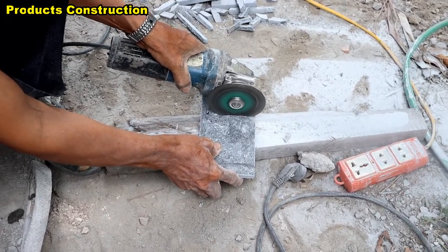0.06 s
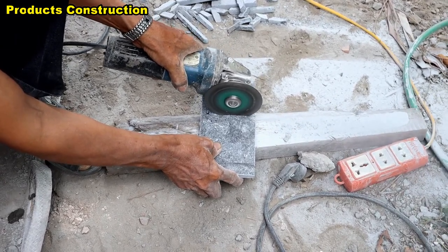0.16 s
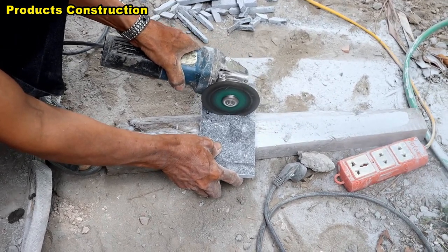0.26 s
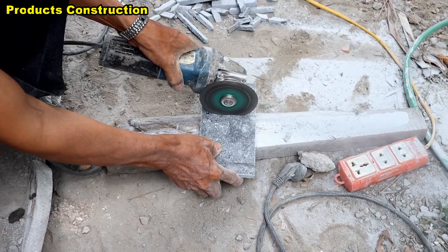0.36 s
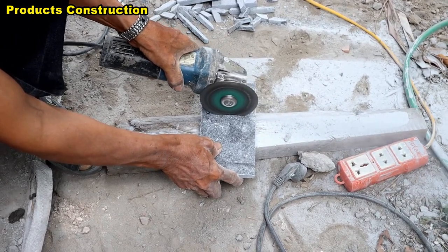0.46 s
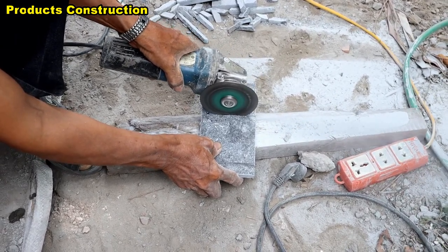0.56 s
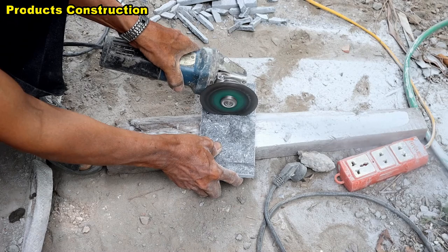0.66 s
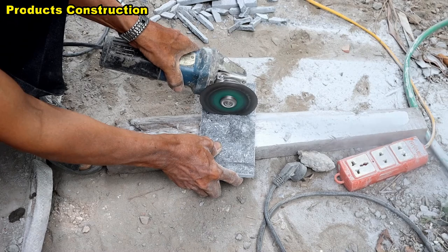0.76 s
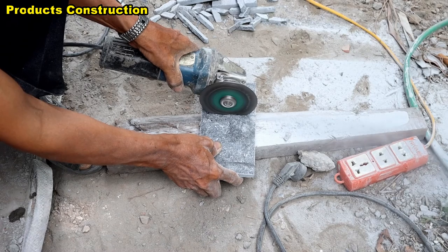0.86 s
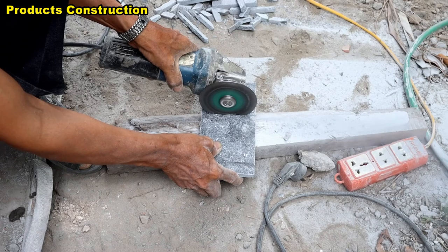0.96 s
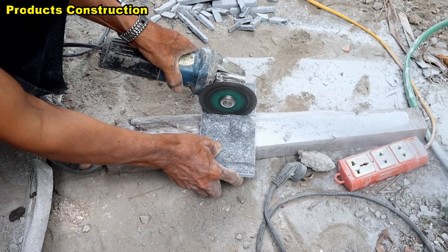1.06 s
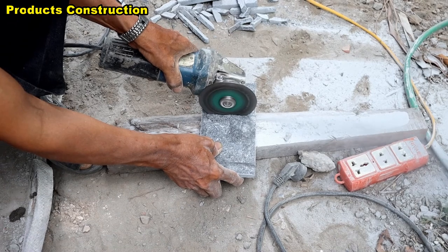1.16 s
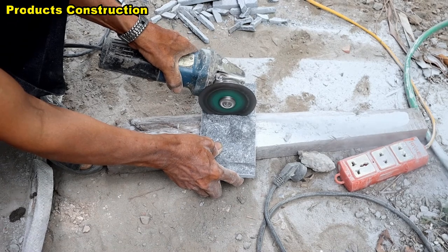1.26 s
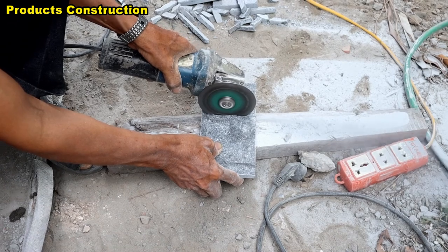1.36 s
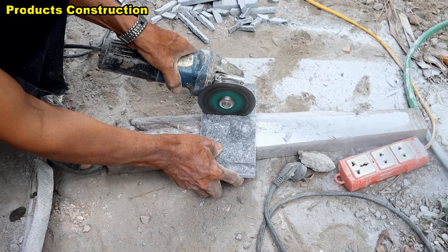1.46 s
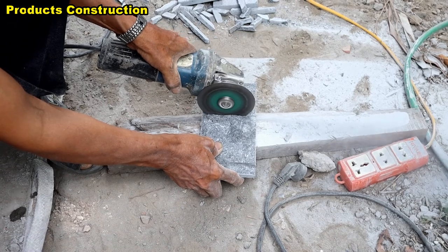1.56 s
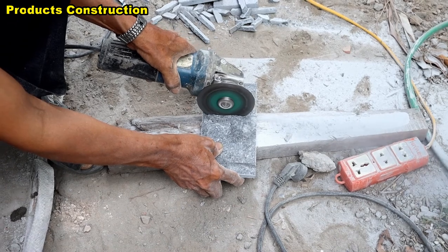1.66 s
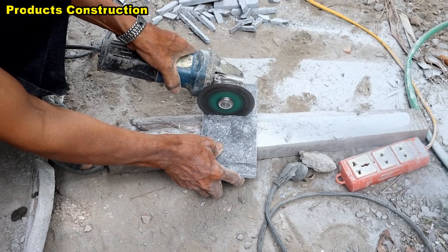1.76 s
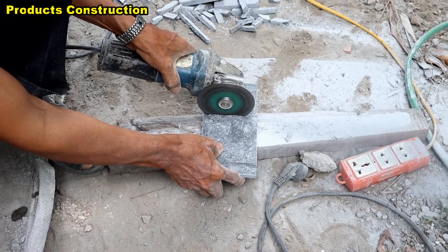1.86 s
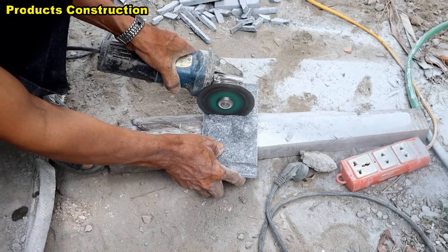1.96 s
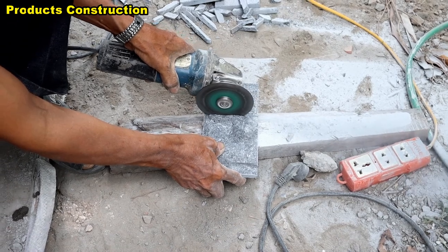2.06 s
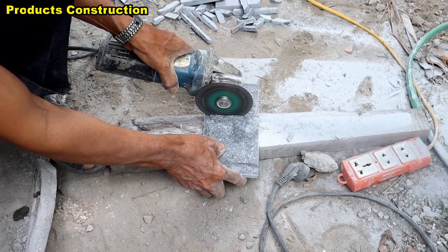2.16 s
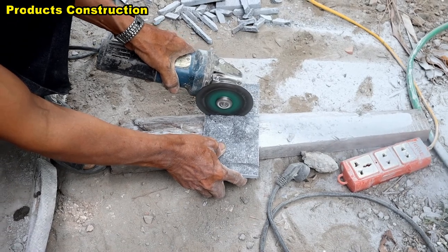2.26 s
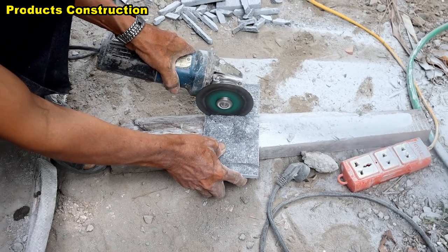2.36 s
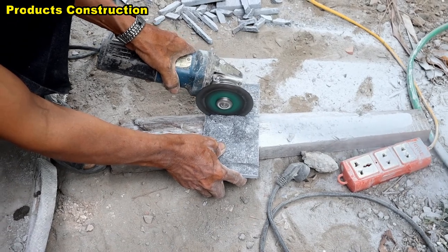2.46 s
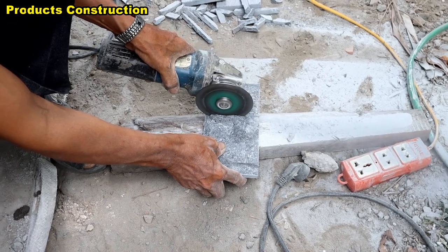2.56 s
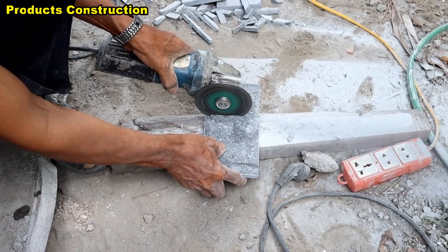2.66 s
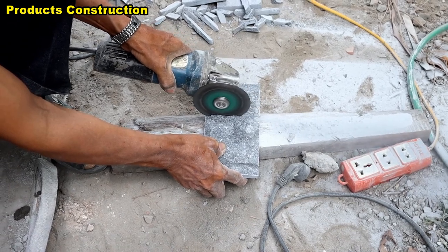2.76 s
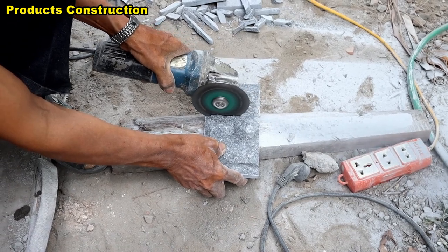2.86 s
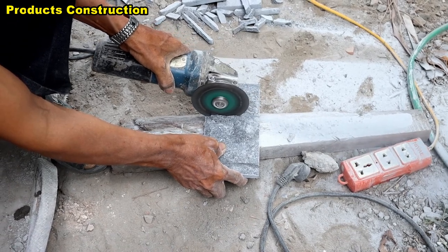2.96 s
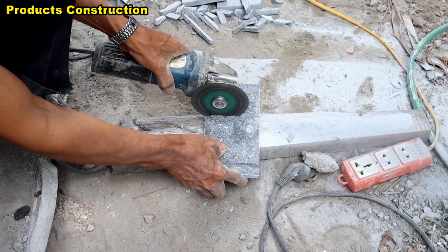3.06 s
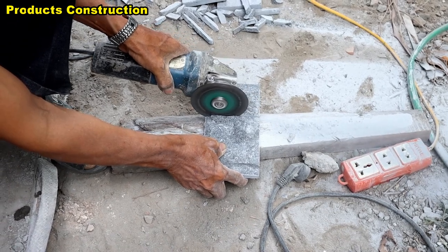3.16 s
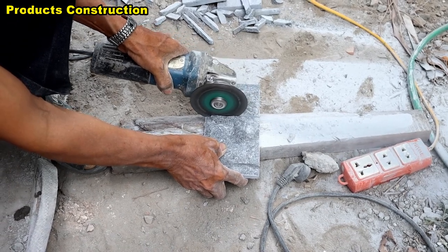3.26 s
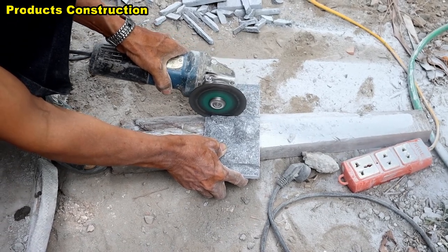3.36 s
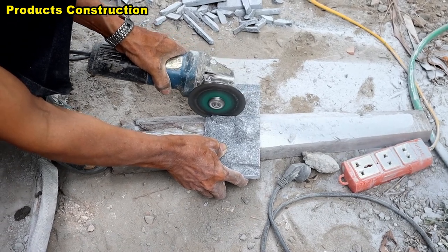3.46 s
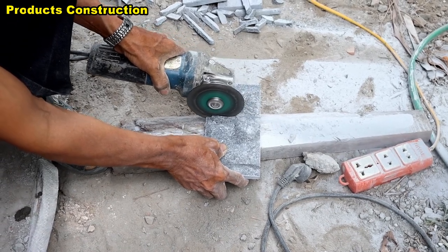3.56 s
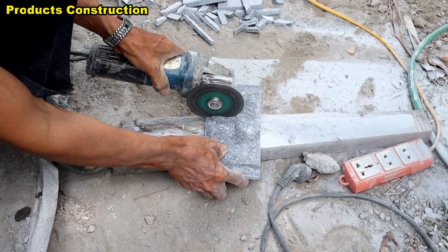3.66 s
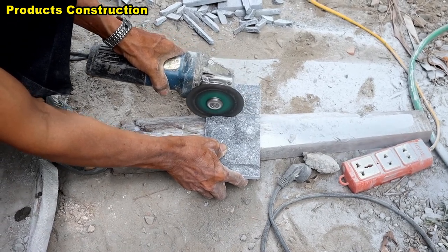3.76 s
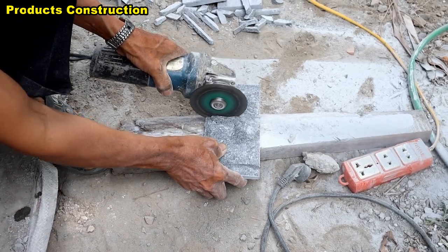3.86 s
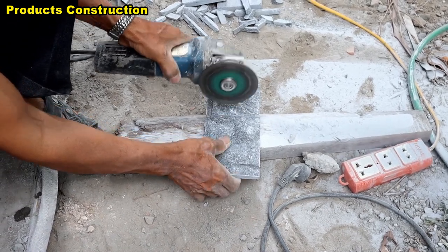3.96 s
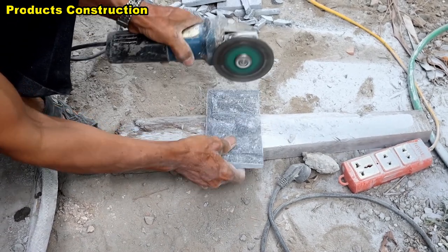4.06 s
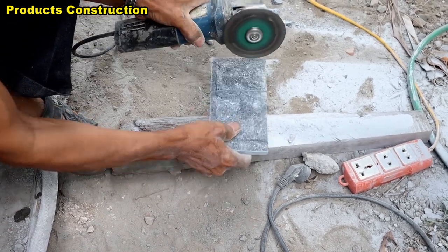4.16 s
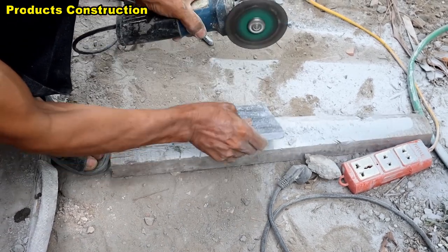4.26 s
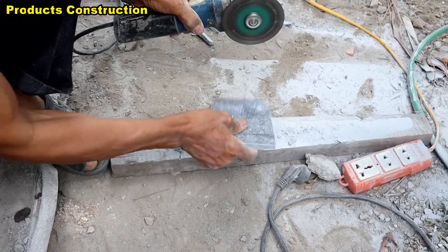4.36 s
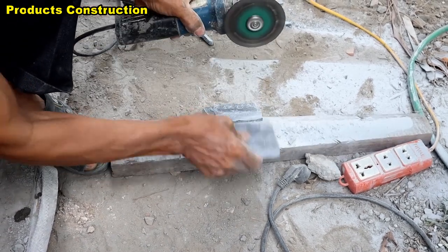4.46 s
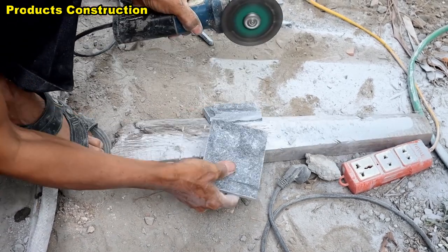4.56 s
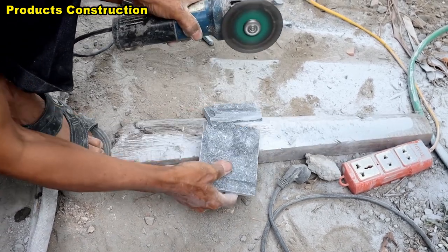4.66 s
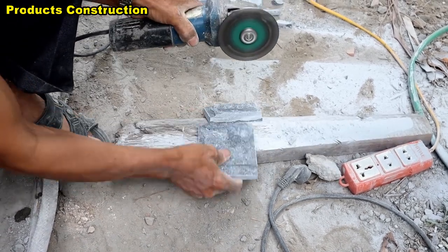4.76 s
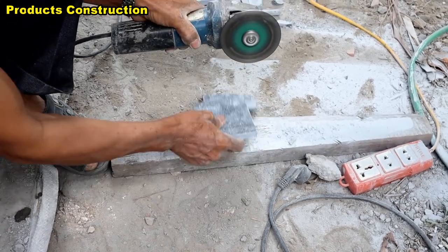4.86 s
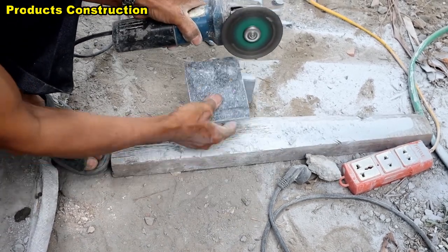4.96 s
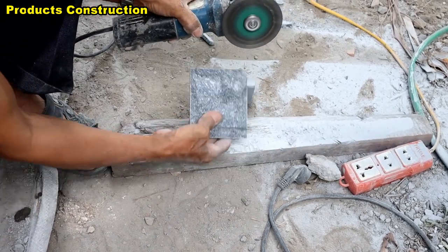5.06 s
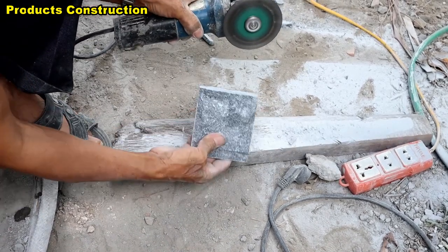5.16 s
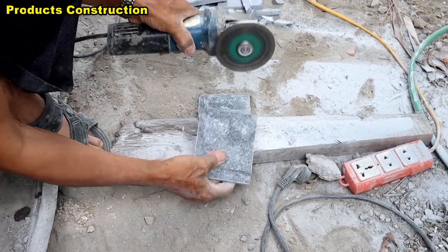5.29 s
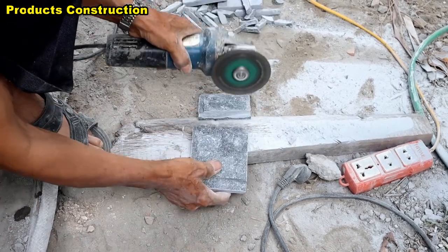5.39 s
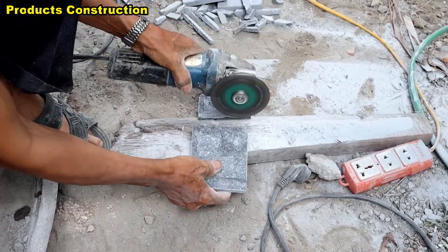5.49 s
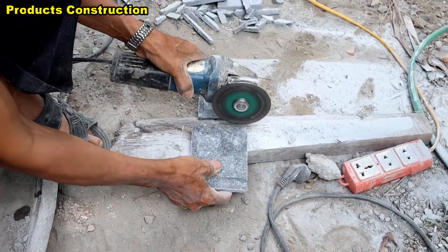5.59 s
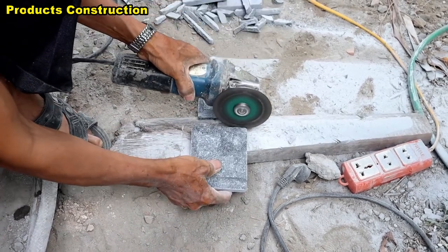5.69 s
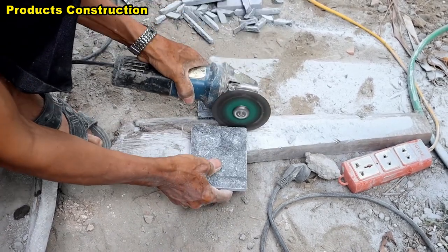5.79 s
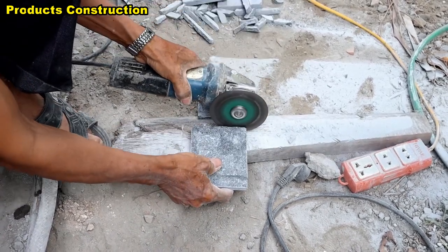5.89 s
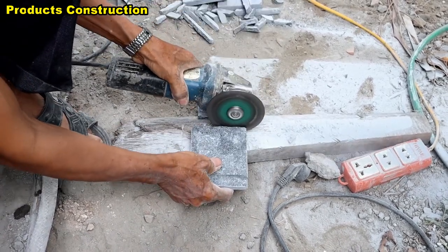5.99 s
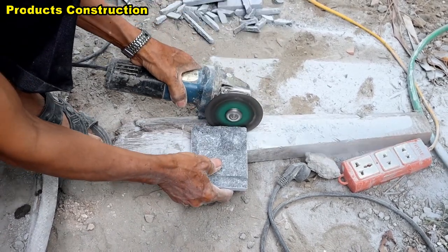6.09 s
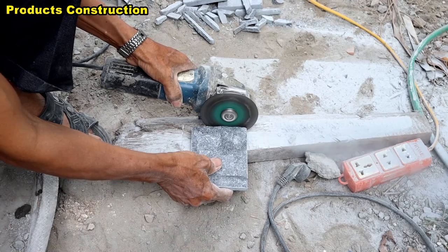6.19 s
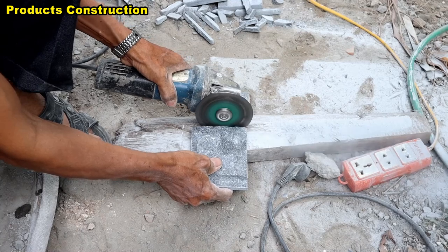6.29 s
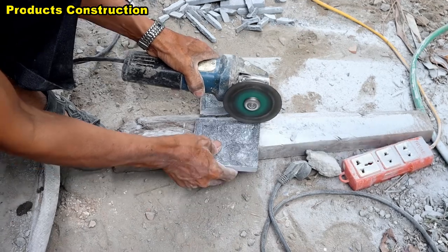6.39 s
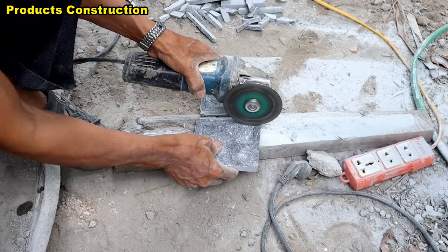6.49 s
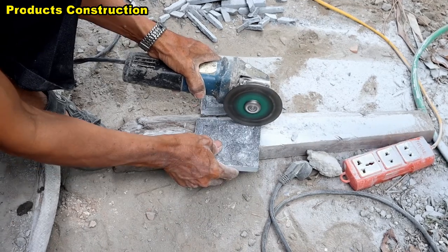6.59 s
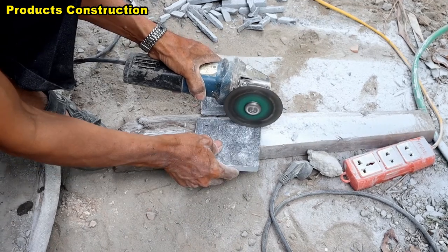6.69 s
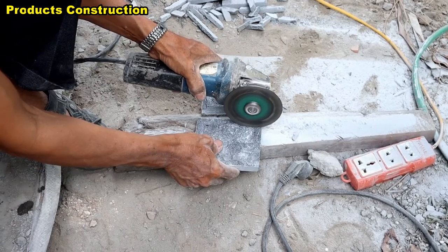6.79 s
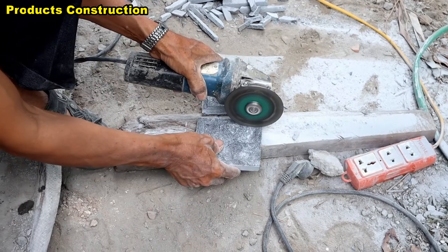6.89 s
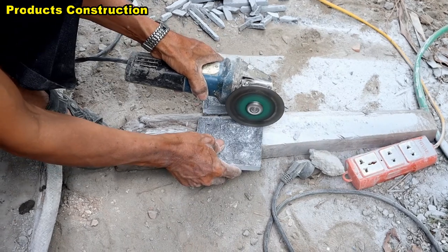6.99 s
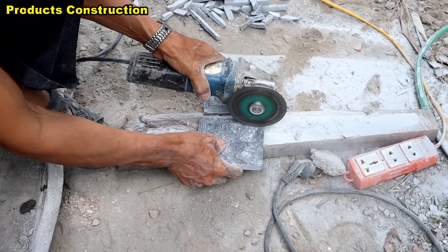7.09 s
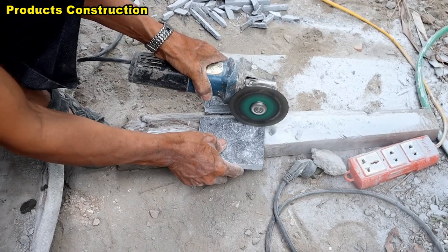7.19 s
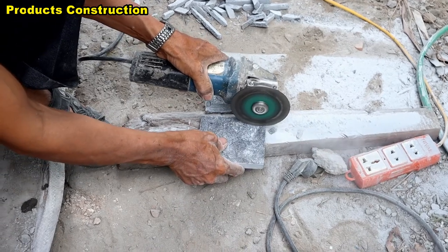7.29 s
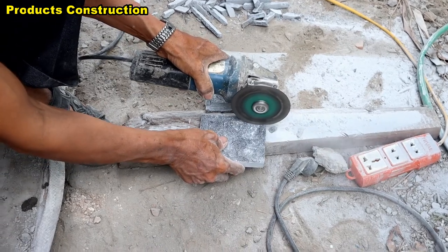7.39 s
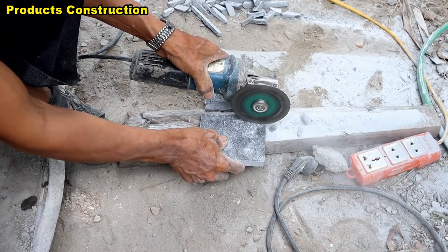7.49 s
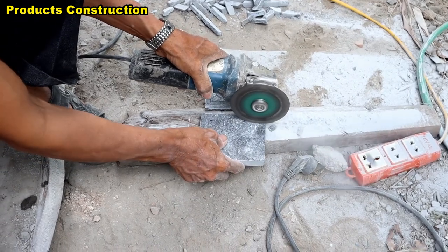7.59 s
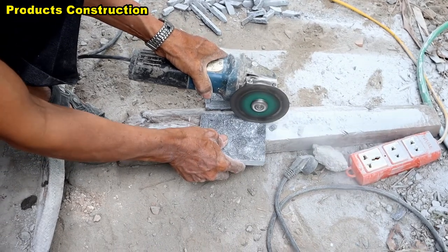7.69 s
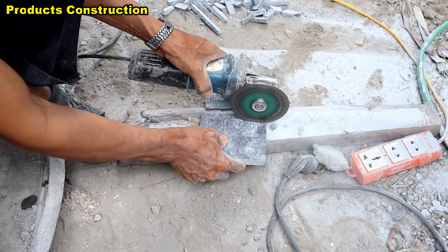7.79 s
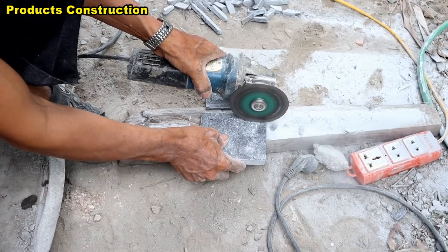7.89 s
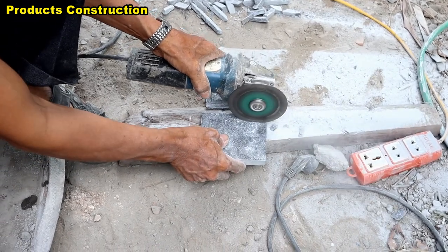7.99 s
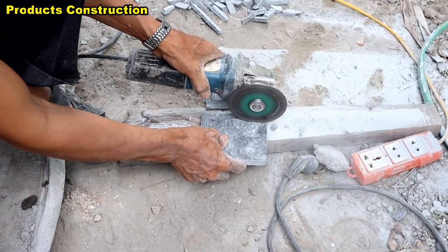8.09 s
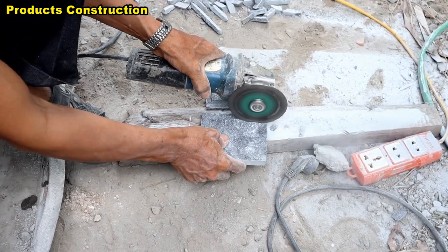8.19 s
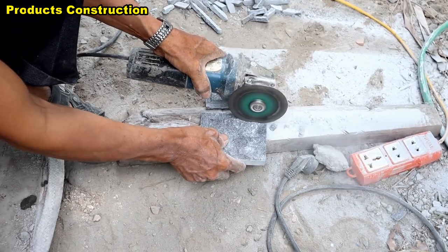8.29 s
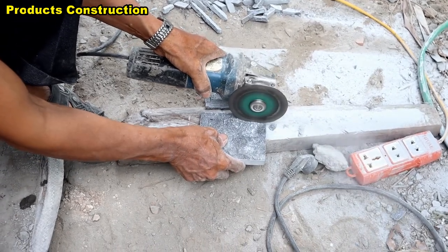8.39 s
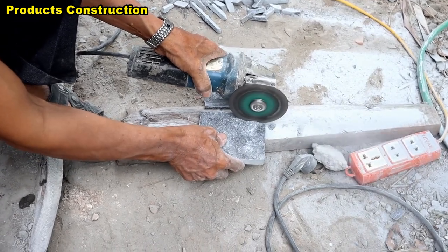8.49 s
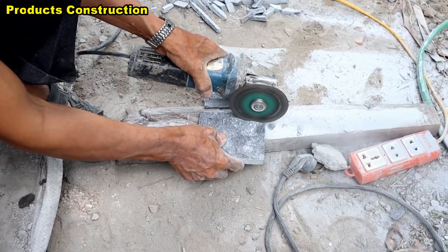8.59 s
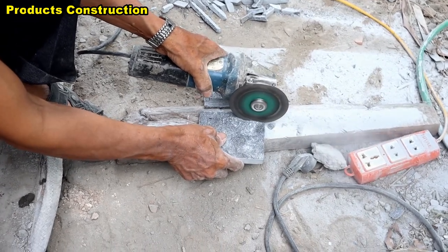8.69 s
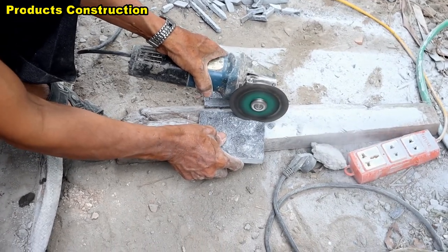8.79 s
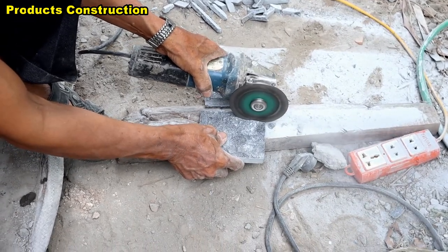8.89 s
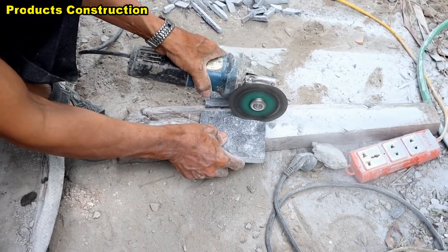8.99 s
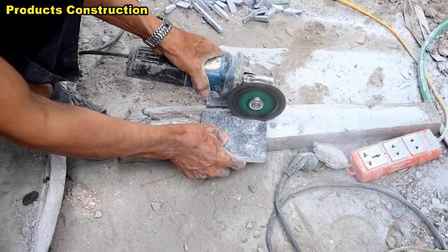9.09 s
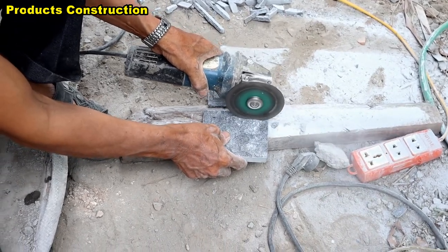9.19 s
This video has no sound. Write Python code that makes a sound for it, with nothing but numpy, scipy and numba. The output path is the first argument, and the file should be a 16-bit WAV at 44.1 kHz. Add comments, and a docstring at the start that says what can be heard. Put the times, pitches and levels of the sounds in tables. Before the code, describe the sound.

An angle grinder screeches through a stone tile up close, breaks free and whirs while the tile is knocked about, grazes, then cuts again louder.

```python
"""An angle grinder, close to the microphone, is already sawing a strip off a stone tile; the strip's tone sinks.
The disc breaks through and runs free while the tile is knocked and dragged on a plank. It strikes the stone in a
short graze, then sinks into a second, louder cut. Grit noise rings resonators for disc, tile, strip and housing;
gliding sines squeal and slip. Throughout, resonators at multiples of the disc speed whine, filtered noise makes
the rush of the cooling fan, and low noise puffs buffet the microphone."""
import sys
import numpy as np
from scipy import signal
from scipy.fft import rfft, irfft, next_fast_len
from scipy.io import wavfile
from numba import njit

SR = 44100
rng = np.random.default_rng(int(sys.argv[2]) if len(sys.argv) > 2 else 0)


def dump_mix(stems):
    """Bounce the given channels to the path in sys.argv[1] as a 16-bit WAV at rate SR."""
    frames = np.atleast_2d(stems).T  # one column per channel
    limited = np.clip(frames, -1, 1)  # hard clip at full scale
    pcm = np.round(limited * 32767).astype(np.int16)
    wavfile.write(sys.argv[1], SR, pcm)


N = 407925
TIME = np.arange(N) / SR   # seconds

# disc on stone, long cut, graze, long cut: start_s, end_s, grinding_db, ease_in_s, release_s,
# freedom_at_start, freedom_at_end (0 pinched in the slot, 1 riding on its edge)
CUTS = [(-.5, 4.07, -29, .3, .05, 0, 0.27), (5.872, 6.119, -25, 0.00054, .02, 0.12, 0.48),
        (6.55, 11.1, -21.5, 0.29, .06, 0.78, 0.4)]
# modes of the free tile: pitch_hz, width_hz, level_db
TILE = [(1117, 112, 1), (460, 75, -28), (1610, 460, -8), (2700, 630, -25)]
# narrow modes that sing out of the grinding, mostly the disc's: pitch_hz, width_hz, shift_at_full_depth_hz,
# first_cut_db, graze_db, second_cut_db, left_right_db
SINGING = [(1570, 86, 14, -25, -19, -25, 5), (2964, 51, 6, -9.5, -8, -15, -8.5),
           (3377, 48, 104, -28, -12, -9, -3), (3470, 56, 67, -6, -13, -18, 6.5),
           (3700, 55, 7, -4.5, -12, -10.5, 2), (3985, 59, -3, -26, -21, -13.5, -1),
           (4310, 42, 90, -9.5, -18, -13.5, 18), (4915, 67, -24, -41, -13, -8.5, 2.5),
           (5360, 74, 166, -25.5, -18, -20, -8), (6190, 71, -80, -14.5, -19, -14.5, -8.5),
           (6216, 68, 195, -13.5, -21, -16.5, 0), (7360, 97, -100, -19.5, -19.5, -21.5, -1),
           (8760, 55, -100, -26, -26, -24, -8), (10600, 61, 0, -27, -35, -24, -7)]
# how deep the disc sits in the slot: time_s, depth (0-1)
DEPTH = [(0, 0.76), (1.3, 0.94), (2.5, 0.53), (3.5, 0.2), (4.07, 0.05), (6.9, 0), (7.5, 0.25), (8.4, 0.74),
         (9.25, 0.62)]


def from_db(db):
    """Decibels to amplitude."""
    return 10 ** (np.asarray(db) / 20)


def rms_one(x):
    """Scale to an rms of 1."""
    return x / np.sqrt(np.mean(x ** 2) + 1e-20)


def in_time(rows):
    """Draw each column as a curve over the whole scene; the first column is time in seconds."""
    s, *columns = np.transpose(rows)
    return [np.interp(TIME, s, column) for column in columns]


def panned(pan_db):
    """Left and right gains of unchanged total power."""
    return rms_one(from_db([[pan_db / 2], [-pan_db / 2]]))


def bump(s, length):
    """A smooth swell of height 1, down to 14 % at one length from its centre."""
    out = np.zeros(N)
    near = np.abs(TIME - s) < 3 * length
    out[near] = np.exp(-2 * ((TIME[near] - s) / length) ** 2)
    return out


def drift(rate_hz):
    """Slow chance of spread 1: noise through two equal low-pass poles, drawn at every 40th sample."""
    step = 40
    r = np.exp(-2 * np.pi * rate_hz * step / SR)
    noise = rng.standard_normal(N // step + 2002)
    slow = signal.lfilter([1], [1, -2 * r, r * r], noise)[2000:]   # skip the filter's start-up
    return np.interp(np.arange(N) / step, np.arange(len(slow)), rms_one(slow))


def coloured(spectrum):
    """Diffuse stereo noise of the given colour; rms 1."""
    size = next_fast_len(N)
    hz, db = np.transpose(spectrum)
    bins_hz = np.maximum(np.arange(size // 2 + 1) * SR / size, 1)
    gain = from_db(np.interp(np.log(bins_hz), np.log(hz), db))
    noise = rfft(rng.standard_normal((2, size)))
    return rms_one(irfft(noise * gain, size)[:, :N])


@njit
def resonate(force, hz, width):
    """Two one-pole resonators in series, whose centre and width may move; steady power for noise."""
    out = np.zeros(force.shape)
    for side in range(2):
        first, second, pole, gain = 0j, 0j, 0j, 0.
        for i in range(force.shape[1]):
            if i % 32 == 0:
                r = np.exp(-np.pi * width[i] / SR)
                pole = r * np.exp(2j * np.pi * hz[i] / SR)
                gain = (1 - r) ** 1.5
            first = pole * first + gain * force[side, i]
            second = pole * second + first
            out[side, i] = second.real
    return out


def mode(grains, hz, width):
    """One mode rung by grains, which each mode meets from another starting point; rms 1."""
    force = np.roll(grains, rng.integers(N), axis=1)
    return rms_one(resonate(force, hz * np.ones(N), width * np.ones(N)))


def each_turn(x, speed, share, count=3):
    """The same rim comes round again: a share of the sound repeats every turn, in strands that follow the speed."""
    out = x.copy()
    for k in range(1, count + 1):
        delay = (k * SR / speed).astype(int)
        out += share ** k * np.take(x, np.arange(N) - delay, axis=1)   # the start borrows from the end
    return out / np.sqrt(np.sum(share ** (2 * np.arange(count + 1))))


def site(x):
    """A few early echoes from floor and walls, different at each ear; the power is kept."""
    # left_delay_s, right_delay_s, level_db
    echoes = [(.0047, 0.0031, -13), (.0113, 0.0058, -23), (.0179, 0.016, -22)]
    out = x.copy()
    for *delays, db in echoes:
        for side, delay in enumerate(delays):
            lag = round(delay * SR)
            out[side, lag:] += from_db(db) * x[side, :-lag]
    return out / np.sqrt(1 + sum(from_db(db) ** 2 for left, right, db in echoes))


def buffeting(puff_db, rumble_db):
    """Eddies from the fan hit each microphone port separately, fluttering faster in a draught."""
    # the fan's draught sweeps over the microphone: time_s, level_db (before rumble_db), length_s
    draughts = [(5.354, -61.5, 0.56), (6.25, -67.5, 0.95), (8.5, -68, 0.44)]
    # rumble: frequency_hz, level_db per Hz
    rumble_colour = [(20, -17), (60, 4), (120, 0), (250, 3), (400, -11), (800, -27)]
    # the strongest puffs on the microphone: time_s, level_db (before puff_db), top_hz
    puffs = [(5.098, -40, 145), (5.14, -49, 130), (5.207, -38.5, 168), (5.372, -54, 408), (5.47, -46, 160),
             (5.523, -38, 250), (5.59, -53, 150), (5.72, -43, 300), (5.867, -47, 386), (6.0, -51, 140),
             (6.253, -49, 200), (6.429, -46, 207), (6.513, -43, 290), (6.94, -38, 470), (7.006, -44, 337),
             (7.072, -35.5, 460), (7.233, -32, 454.4), (7.503, -45, 330), (7.567, -42.5, 270),
             (8.23, -53, 198.3), (8.415, -47, 262), (8.692, -44, 302), (8.798, -42.5, 311.5)]
    calm_db, puff_s = -70.5, 0.022   # turbulence between draughts (before rumble_db); length of a puff

    draught = sum(from_db(db) * bump(s, length) for s, db, length in draughts)
    draught *= from_db(4.0 * drift(23))
    calm = from_db(calm_db + 4.9 * drift(9))
    out = from_db(rumble_db) * (calm + draught) * coloured(rumble_colour)
    eddies = rng.standard_normal((2, N))
    for s, db, top_hz in puffs:
        band = signal.butter(2, [top_hz / 4.3, top_hz], "band", fs=SR, output="sos")
        puff = rms_one(signal.sosfilt(band, eddies))
        out += from_db(db + puff_db) * bump(s, puff_s) * puff
    return out


def fan_rush(speed):
    """The fan's gritty rush: air noise that flutters and partly repeats with every turn."""
    # frequency_hz, level_db per Hz
    air_colour = [(180, -20.5), (300, -14.5), (517, -12), (590, -5), (652, -4.5), (1120, -2), (1460, -4.5),
                  (2280, 0), (2740, -3.5), (4070, -4), (4420, -7.5), (5130, -8), (7500, -19.5),
                  (14000, -33.5), (15500, -47)]
    flutter = from_db(1.26 * drift(19.0) + 1.53 * drift(160))
    return each_turn(coloured(air_colour), speed, share=0.14) * flutter


def motor_whine(turbulence, speed, growth):
    """Wavering tones of motor and gears at multiples of the disc speed; they fade as it slows."""
    # multiple_of_disc_speed, width_hz, level_db (against the other tones)
    tones = [(3.99, 22, -1), (6.02, 29, -4), (8.04, 45, -7), (12, 40, -13), (14, 45, -9), (15.05, 99, -3),
             (16, 90, -1), (16.6, 28, -6), (20, 32, -4), (48.4, 70, -16)]
    free_speed = 149   # turns per s at which the whine has its full level
    wavering = speed * (1 + 0.0073 * drift(12))
    whine = np.zeros((2, N))
    for multiple, width, db in tones:
        whine += from_db(db + 2.1 * drift(21)) * mode(turbulence, multiple * wavering, width)
    return whine * (speed / free_speed) ** growth


def idle_ring(turbulence):
    """The disc rings faintly as it spins in the air."""
    # pitch_hz, width_hz, level_db (against the air curve), left_right_db
    ring_modes = [(3810, 100, -9, 17), (4005, 85, -6, 13), (4950, 140, -11, -10)]
    out = np.zeros((2, N))
    for hz, width, db, pan_db in ring_modes:
        out += from_db(db + 3.6 * drift(4.5)) * panned(pan_db) * mode(turbulence, hz, width)
    return out


def motor(speed, rush_db, whine_db, whine_growth):
    """Fan rush, whine and the disc's ring in air share one level curve."""
    # level to which rush, whine and ring are set: time_s, level_db
    air = [(0, -65.5), (2, -64.5), (4.15, -59.5), (4.4, -54.5), (5.5, -44.5), (5.86, -44), (5.9, -48.5),
           (6.13, -48.5), (6.8, -43.5), (7.1, -48), (8.3, -49), (9.25, -53.5)]
    turbulence = rng.standard_normal((2, N))
    rush = from_db(rush_db) * fan_rush(speed)
    whine = from_db(whine_db) * motor_whine(turbulence, speed, whine_growth)
    return from_db(in_time(air)[0]) * (rush + whine + idle_ring(turbulence))


def scuffs():
    """The tile drags over the plank: short swells of dull noise."""
    # time_s, level_db, length_s
    drags = [(4.371, -37, 0.012), (4.38, -38, 0.018), (5.03, -51, .008), (5.32, -34, 0.049),
             (5.523, -39, .03)]
    # frequency_hz, level_db per Hz
    scuff_colour = [(60, -10), (400, 2), (1100, 12), (1800, 3), (2600, -2), (4000, -10), (8000, -34),
                    (15000, -45)]
    return sum(from_db(db) * bump(s, length) for s, db, length in drags) * coloured(scuff_colour)


def edge_clacks():
    """The tile's edge clacks on stone: noise that starts abruptly and dies within milliseconds."""
    # time_s, level_db
    touches = [(4.3704, -31), (5.029, -35)]
    # frequency_hz, level_db per Hz
    clack_colour = [(300, -12), (1200, -6), (2600, 4), (3800, -6), (6000, -22), (15000, -40)]
    decay_s = .0028
    envelope = np.zeros(N)
    for s, db in touches:
        fall = np.exp(-np.minimum(np.abs(TIME - s) / decay_s, 20))
        envelope += from_db(db) * (TIME > s) * fall
    return envelope * coloured(clack_colour)


def knocks():
    """The tile lands softly on the plank: each mode swells for a few cycles and dies."""
    # time_s, peak_db, left_right_db, damping (times that of the free tile)
    landings = [(4.3645, -20.5, 6, 1.3), (4.385, -31.5, .5, 0.67), (5.045, -39, 5, 0.77),
                (5.295, -30.5, 5, 0.61), (5.52, -34, 0, 1)]
    out = np.zeros((2, N))
    age = TIME[:SR // 10]
    for s, peak_db, pan_db, damping in landings:
        ring = np.zeros(len(age))
        for hz, width, db in TILE:
            decay = np.pi * damping * width * age
            ring += from_db(db) * decay * np.exp(1 - decay) * np.sin(2 * np.pi * hz * age)
        at = round(s * SR)
        out[:, at:at + len(age)] += from_db(peak_db) * panned(pan_db) * ring
    return out


def grit_grains(size_db):
    """Countless tiny fractures of uneven size."""
    size = np.minimum(rng.exponential(1, (2, N)), 5)
    return rng.standard_normal((2, N)) * from_db(size_db * size)


def tile_strength():
    """How strongly the held tile rings in the two long cuts, chattering under the hand."""
    # time_s, level_db (before ring_db), for the first and the second long cut
    first_cut = [(0, -59), (0.55, -56), (0.85, -50.5), (1.45, -46), (1.8, -53.5), (2.03, -65), (2.3, -52.5),
                 (2.9, -47.5), (3.45, -52), (4.0, -53.5)]
    second_cut = [(6.6, -60), (7.05, -38), (7.36, -35.5), (7.52, -28), (7.66, -29), (7.82, -26.5),
                  (8.05, -33.5), (8.45, -32.5), (8.72, -38.5), (9.0, -30.5), (9.25, -31)]
    ring_db, flutter_db, flutter_hz = -1, 3.5, 23
    strength = np.zeros(N)
    for curve in (first_cut, second_cut):
        s, db = np.transpose(curve)
        during = np.interp(TIME, s, np.ones(len(s)), 0, 0)   # silent outside the curve
        strength += during * from_db(np.interp(TIME, s, db))
    return strength * from_db(ring_db + flutter_db * np.minimum(drift(flutter_hz), 1))


def contact():
    """Each cut eases in, bites, settles and eases off: strength of the grinding and the disc's freedom."""
    ease_in_db = 12            # the first touch is this much lighter
    bite_db, bite_s = 2.5, 0.15   # the fresh edge bites harder, then settles
    exit_db, exit_s = 4, 1     # the hand eases off towards the far edge
    grind, freedom = np.zeros((2, N))
    for start, end, db, ease_s, release_s, first, last in CUTS:
        on = (TIME > start) & (TIME < end)
        age, left = TIME[on] - start, end - TIME[on]
        entry = np.interp(age, [0, ease_s], [-ease_in_db, 0])
        bite = bite_db * np.exp(-np.maximum(age - ease_s, 0) / bite_s)
        easing_off = np.interp(left, [0, exit_s], [-exit_db, 0])
        release = np.sqrt(np.minimum(left / release_s, 1))
        grind[on] = from_db(db + entry + bite + easing_off) * release
        freedom[on] = np.interp(age, [0, end - start], [first, last])
    return grind, np.clip(freedom, 0, 1)


def pressure(speed, chatter_db, wobble_db):
    """The bite varies with the hand's chatter, with each turn of the disc and with snags."""
    # the disc skips or snags on hard grains: time_s, extra_db, length_s
    hard_grains = [(0.328, 3.5, 0.011), (0.94, 3.5, .008), (0.991, 6, 0.0043), (1.065, 6.5, 0.0033),
                   (1.311, 3, 0.012), (1.741, 2, 0.1), (1.834, 2.5, 0.009), (1.928, 5.5, 0.0052),
                   (2.768, -1, 0.011), (3.047, -5, 0.0088), (3.318, -4, 0.01), (3.329, 7, .003),
                   (3.364, 4, 0.017), (3.423, 0, 0.012), (5.875, 2, 0.0046), (6.048, 1, .008),
                   (6.575, 3, 0.023), (6.621, -6, 0.038), (6.708, -2, 0.012), (6.762, -3, .025),
                   (6.968, -0.5, 0.014), (7.097, 2.5, .006), (7.432, 2.5, 0.02), (8.195, 2.5, 0.022),
                   (8.347, 1.5, 0.027), (7.662, 3, 0.013)]
    turn = 2 * np.pi * np.cumsum(speed) / SR
    snags = sum(db * bump(s, length) for s, db, length in hard_grains)
    return from_db(chatter_db * drift(82) + wobble_db * np.sin(turn) + snags)


def housing_rattle(grains, grind, freedom, speed):
    """Guard and housing rattle under load, most when the disc is pinched or slow."""
    # pitch_hz, width_hz, level_db (before the load)
    housing_modes = [(239, 75, -65.5), (311.5, 73, -62), (794, 200, -54)]
    load = (grind / from_db(-27.0)) ** 0.27 * from_db(-6.0 * freedom) * (120 / speed) ** 1.9
    return load * sum(from_db(db) * mode(grains, hz, width) for hz, width, db in housing_modes)


def held_tile(grains):
    """Held down, the tile is stiffer and more damped: its modes lie higher and wider."""
    stiffer, damped = 1.0346, 1.32
    ring = sum(from_db(db) * mode(grains, hz * stiffer, width * damped) for hz, width, db in TILE)
    return from_db(0.5) * ring * tile_strength()


def loosening_strip(grains):
    """The strips ring lower as the slot sets them loose, and during the graze a steady tone near 775 Hz rings;
    an upper mode of the second strip sinks with it."""
    # main mode (during the graze a steady tone), then upper mode: time_s, pitch_hz, level_db (against the
    # grinding)
    main_mode = [(0, 1960, -19), (.5, 1826, -16), (.85, 1760, -11.5), (1.05, 1640, -10), (1.22, 1610, -6),
                 (1.4, 1570, -16.5), (2, 1365, -33), (2.35, 1326, -23.5), (2.75, 1190, -25),
                 (2.95, 1126, -15), (3.1, 1051, -25), (3.7, 770, -23), (4.07, 700, -35), (5.87, 770, -26),
                 (6.12, 776, -15), (6.55, 1260, -42), (7.05, 1160, -28), (7.27, 1125, -6.5),
                 (7.42, 1120, -27), (7.7, 837, -22.5), (8.1, 803, -23), (8.5, 750, -21.5),
                 (9.25, 724, -20.5)]
    upper_mode = [(6.9, 1990, -50), (7.3, 1880, -20), (7.7, 1750, -24), (8.2, 1630, -19), (8.5, 1546, -13),
                  (9.25, 1535, -27)]
    width_hz = 108
    main_hz, main_db = in_time(main_mode)
    upper_hz, upper_db = in_time(upper_mode)
    main = from_db(main_db + 4.1 * drift(9.6)) * mode(grains, main_hz, width_hz)
    return main + from_db(upper_db) * mode(grains, upper_hz, width_hz)


def grit_hiss(freedom):
    """Crumbling grit hisses, louder when the disc is free."""
    # frequency_hz, level_db per Hz
    grit_colour = [(200, -25), (500, -10.5), (1400, 3), (2500, 4), (4000, -7), (5600, -24), (6900, -13),
                   (8000, -3.5), (11000, -10), (13500, -22), (14500, -15), (15500, -21)]
    return from_db(-22.0 + 14.3 * freedom) * coloured(grit_colour)


def ring_out(level_db, decay_s):
    """A few modes of the disc ring on after it breaks through the tile."""
    # pitch_hz, level_db (before level_db of the whole)
    last_modes = [(3720, 2), (3985, -7), (4340, -6), (4925, 0), (6220, -6)]
    _, end, _, _, release_s, *_ = CUTS[0]
    age = TIME - end
    ring = np.zeros((2, N))
    for hz, db in last_modes:
        ring += from_db(db) * np.sin(2 * np.pi * (hz * TIME + rng.random((2, 1))))
    rise = np.clip(1 + age / release_s, 0, 1)   # swells while the cut lets go
    return from_db(level_db) * rise * np.exp(-np.abs(age) / decay_s) * ring


def strike():
    """The spinning disc hits the stone as the graze starts, and all the narrow modes ring at once."""
    level_db, decay_s = -14.5, 0.026
    out = np.zeros((2, N))
    age, at = TIME[:SR // 10], round(CUTS[1][0] * SR)
    for hz, _, _, _, graze_db, _, pan_db in SINGING:
        tone = np.sin(2 * np.pi * (hz * age + rng.random((2, 1))))
        ring = tone * np.exp(-age / decay_s)
        out[:, at:at + len(age)] += from_db(level_db + graze_db) * panned(pan_db) * ring
    return out


def squeals(level_db, jitter_hz):
    """Stick and slip locks on to one mode for a moment: an almost pure tone, in another phase at each ear."""
    # time_s, pitch_hz, level_db (before level_db of all), length_s
    catches = [(1.738, 2820, -32, .02), (1.947, 3520, -28, 0.017), (2.047, 3470, -35, .03),
               (2.328, 4360, -33, 0.026), (3.19, 3700, -34, 0.035), (5.896, 2950, -34, .018),
               (6.05, 3470, -26, .01), (6.573, 3390, -42, .016), (6.665, 3390, -29, .022),
               (6.807, 3330, -25, .025), (6.89, 3420, -23, 0.0073), (6.924, 4900, -22, 0.011),
               (6.943, 3390, -21, 0.016), (6.954, 4900, -21.5, 0.011), (6.996, 2965, -24, 0.013),
               (7.113, 4900, -22.5, 0.033), (7.223, 3350, -26, .022), (7.422, 3420, -29, .018),
               (8.046, 3410, -27, .025), (8.29, 3820, -28, 0.02), (8.335, 3490, -25, 0.016),
               (8.427, 3770, -28, 0.017)]
    out = np.zeros((2, N))
    waver = np.cumsum(jitter_hz * drift(63)) / SR   # cycles
    for s, hz, db, length in catches:
        near = np.abs(TIME - s) < 2 * length
        phase = 2 * np.pi * (hz * TIME[near] + waver[near] + rng.random((2, 1)))
        swell = np.exp(-2 * ((TIME[near] - s) / length) ** 2)
        out[:, near] += from_db(db + level_db) * swell * np.sqrt(2) * np.sin(phase)
    return out


def slips(level_db, spread_db, count=640):
    """Small slips at random make one narrow mode after another sing a short, gliding tone."""
    # length; spread of pitch (share); spread of glide (Hz per s)
    slip_s, scatter, glide_spread = .028, 0.013, 1100
    out, depth = np.zeros((2, N + SR)), in_time(DEPTH)[0]
    age = np.arange(-2 * slip_s, 2 * slip_s, 1 / SR)
    swell = np.exp(-2 * (age / slip_s) ** 2)
    chances, spreads = rng.random((count, 4)), rng.standard_normal((count, 3))
    for (when, which, *phases), (detune, glide, size) in zip(chances, spreads):
        at = int(when * N)
        hz, _, shift_hz, *cut_db, pan_db = SINGING[int(which * len(SINGING))]
        hz = (hz + shift_hz * depth[at]) * (1 + scatter * detune)
        cut = sum(at / SR > row[0] for row in CUTS[1:])
        db = level_db + cut_db[cut] + spread_db * min(size, 1)
        cycles = hz * age + glide_spread * glide * age ** 2 / 2 + np.c_[phases]
        tone = swell * np.sin(2 * np.pi * cycles)
        out[:, at:at + len(age)] += from_db(db) * panned(pan_db) * tone
    return out[:, :N]


def singing(grains, stretch, wander, flutter_db):
    """Each cut favours its own narrow modes; the slot damps and shifts them, and they waver with the hand."""
    slot_damping_db, slot_widening = 8, 1.6   # at full depth: weaker by, wider by this share
    depth = np.clip(in_time(DEPTH)[0], 0, 1)
    cut = np.searchsorted([row[0] for row in CUTS[1:]], TIME)
    tuning = stretch * (1 + wander * drift(6.7))
    out = np.zeros((2, N))
    for hz, width, shift_hz, *cut_db, pan_db in SINGING:
        gain = from_db(np.array(cut_db)[cut] - slot_damping_db * depth + flutter_db * drift(9.2))
        ring = mode(grains, (hz + shift_hz * depth) * tuning, width * (1 + slot_widening * depth))
        out += ring * gain * panned(pan_db)
    return out


def disc(grains, stretch, freedom, narrowing, flutter_db, wander):
    """The broad modes of the disc ring narrower when it is free; each flutters and wanders a little."""
    # pitch_hz, width_hz (before damping), pinched_db, free_db, left_right_db
    disc_modes = [(1854, 366, -12.5, -26, -1), (2822, 700, -5.5, -14.5, -8), (2940, 420, -9, -16, -3),
                  (3398, 320, -8.5, -4.5, -5), (3560, 150, -9, -14.5, -0.5), (3731, 140, -4, -5.5, 9),
                  (3962, 170, -11, -9.5, 3), (4352, 330, -13, -10, 30), (4740, 620, -14, -30, -2),
                  (4847, 360, -13.5, -11.5, 0), (5410, 480, -17.5, -19.5, -22),
                  (6200, 550, -21.5, -15.5, -1), (7340, 300, -22.5, -24, -1),
                  (7660, 690, -23.5, -21.5, -12), (8400, 190, -21, -39, 0), (8660, 430, -29.5, -17.5, -3),
                  (9240, 790, -18.5, -29, -7), (10050, 1700, -20.5, -27.5, 2), (10570, 410, -25, -22, 9),
                  (11480, 1800, -21.5, -30, 3.5), (12650, 468, -30, -31, -5), (13370, 610, -25.5, -32, 1.5)]
    damping = 0.86   # share of the listed widths
    sharpen = 1 - narrowing * freedom
    out = np.zeros((2, N))
    for hz, width, pinched_db, free_db, pan_db in disc_modes:
        flutter = drift(22.0)
        gain = from_db(pinched_db + (free_db - pinched_db) * freedom + flutter_db * flutter)
        pitch = hz * stretch * (1 + wander * flutter[::-1])   # reversed, so pitch and level part
        out += mode(grains, pitch, damping * width * sharpen) * gain * panned(pan_db)
    return out


def cutting(speed, stiffening):
    """Grit rings disc, tile and strip and hisses as it crumbles; the housing rattles along."""
    grind, freedom = contact()
    grains = grit_grains(size_db=4.0)
    stretch = 1 + stiffening * (speed / 128 - 1)   # spin stiffens the disc and lifts its modes
    bite = pressure(speed, chatter_db=1.0, wobble_db=0.04)

    steel = from_db(0.76) * disc(grains, stretch, freedom, narrowing=0.28, flutter_db=2.0, wander=0.0049)
    song = singing(grains, stretch, wander=0.0032, flutter_db=3)
    song += slips(level_db=-0.5, spread_db=1.5)
    ringing = bite * grind * each_turn(steel + song, speed, share=0.3)
    ringing += ring_out(level_db=-47, decay_s=0.081)
    ringing += squeals(level_db=1.5, jitter_hz=15.24) + strike()

    growl = grind * loosening_strip(grains) + held_tile(grains)
    growl += housing_rattle(grains, grind, freedom, speed)
    growl = each_turn(growl, speed, share=0.35)
    return site(ringing) + bite * (grind * grit_hiss(freedom) + growl)


def scene():
    """Air at the microphone, motor, tile on the plank, and the cuts."""
    # disc speed, sagging as the hand presses: time_s, speed_turns_per_s
    speed_curve = [(0, 119), (.45, 119), (.85, 110.5), (1.15, 107.5), (1.55, 105), (1.85, 109), (2.27, 129),
                   (2.62, 121), (3.05, 129), (4.05, 130), (4.3, 141), (4.6, 147), (5.8, 149.5), (6.8, 150),
                   (7.1, 144), (7.5, 131.5), (8.0, 132), (8.35, 122.5), (8.75, 118), (9.25, 122.5)]
    speed, = in_time(speed_curve)
    background = buffeting(puff_db=0.5, rumble_db=3.0)
    background += motor(speed, rush_db=13.0, whine_db=-2, whine_growth=3.9)
    handling = scuffs() + knocks() + edge_clacks()
    return background + handling + cutting(speed, stiffening=0.034)


def record(dry):
    """The level dips briefly after the graze; the top is cut."""
    cutoff_hz = 15700   # 70 dB down from here up
    dip = from_db(np.interp(TIME, [6.118, 6.123, 6.128, 6.13], [0, -17, -17, 0]))
    low_pass = signal.cheby2(16, 70, cutoff_hz, fs=SR, output="sos")
    return signal.sosfilt(low_pass, dry * dip)


dry = scene()
out = record(dry)
dump_mix(out)
```